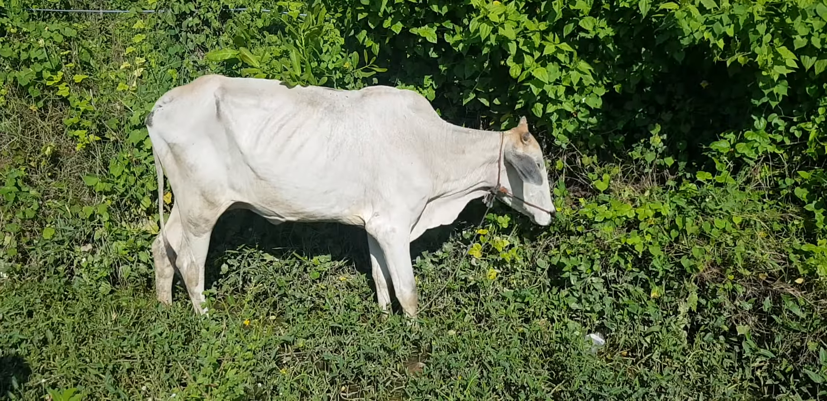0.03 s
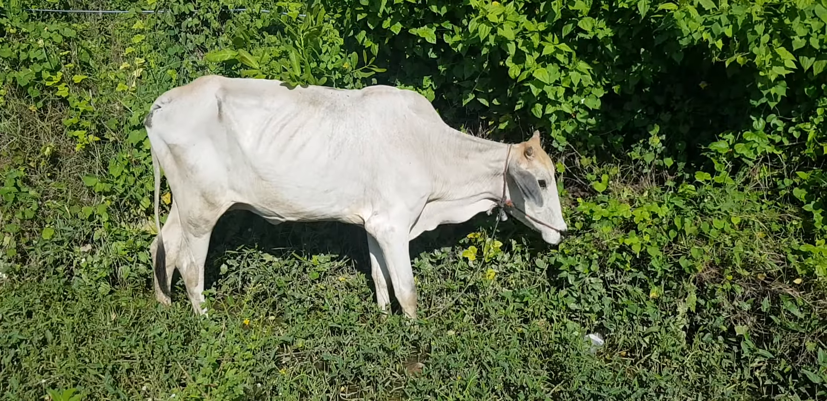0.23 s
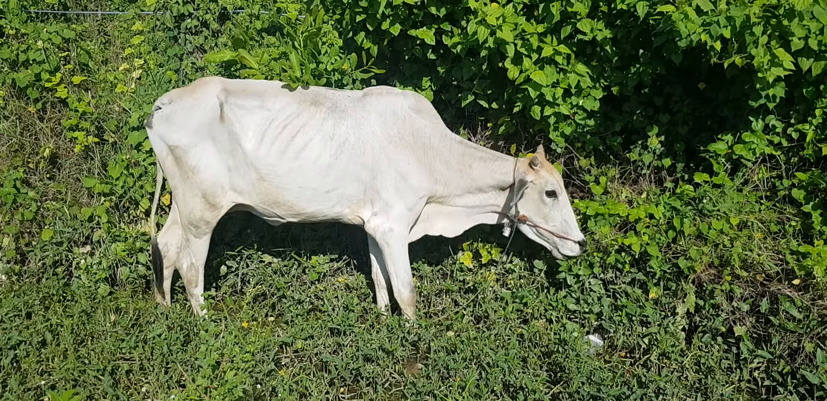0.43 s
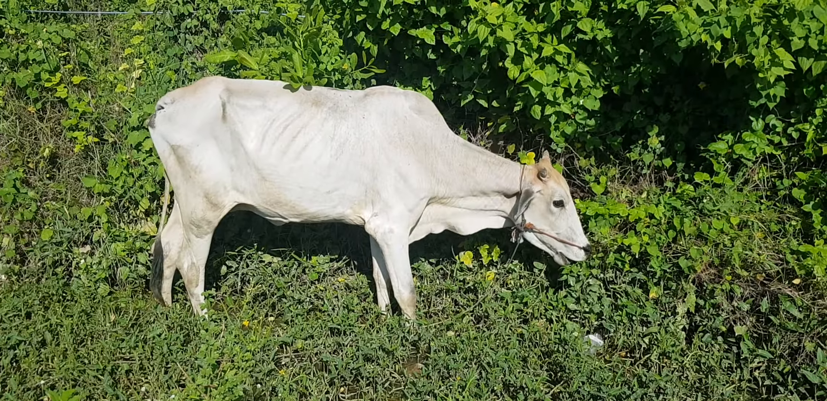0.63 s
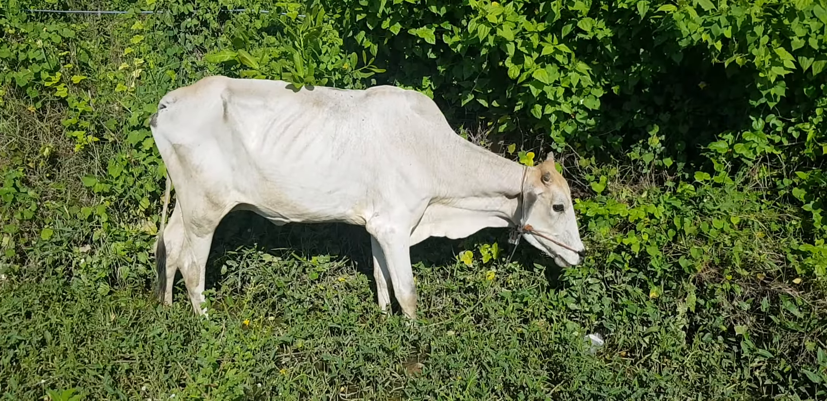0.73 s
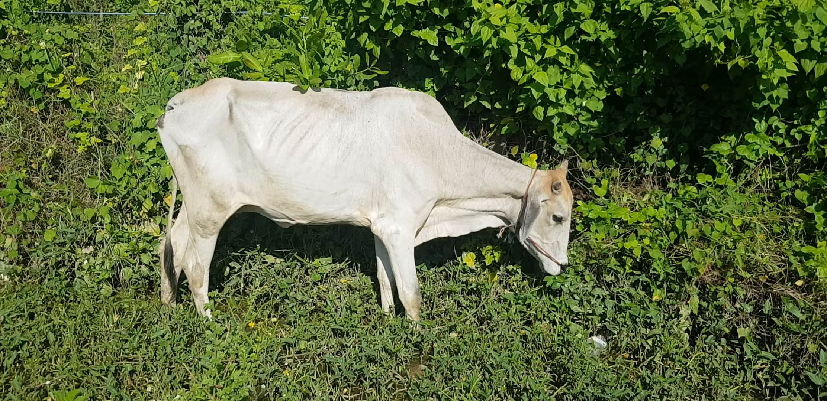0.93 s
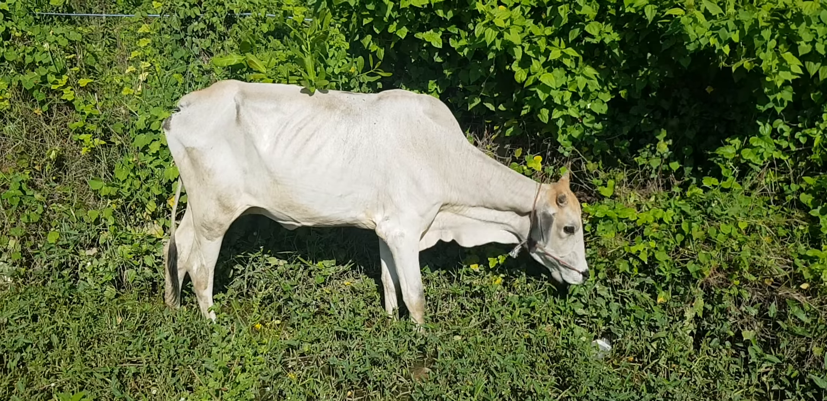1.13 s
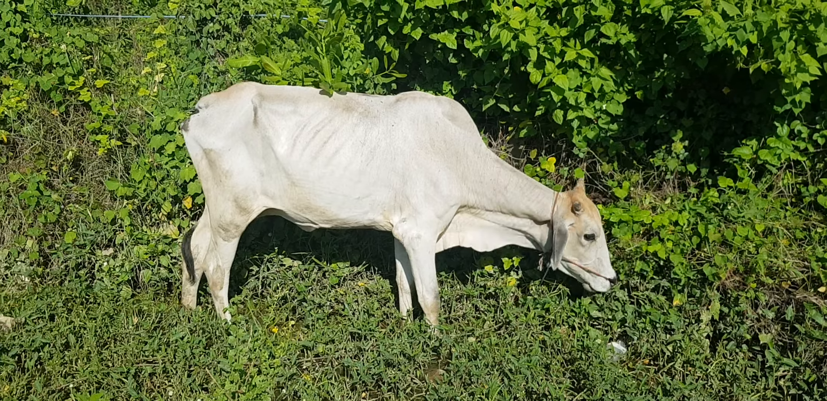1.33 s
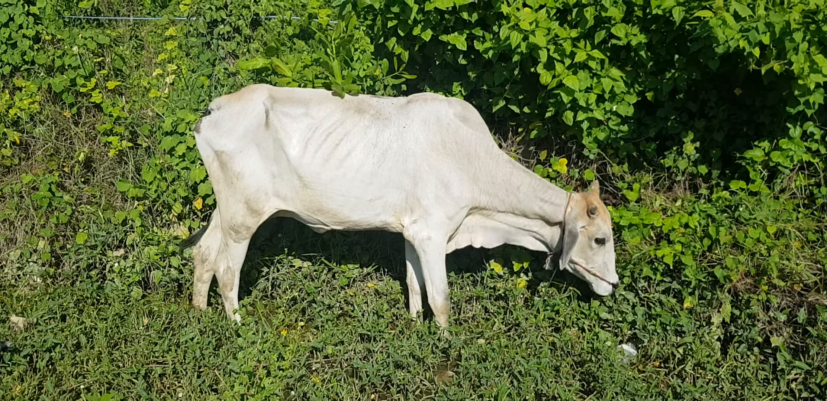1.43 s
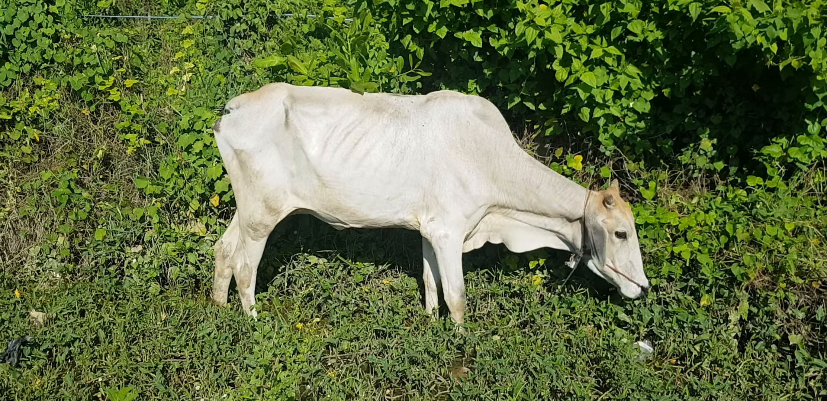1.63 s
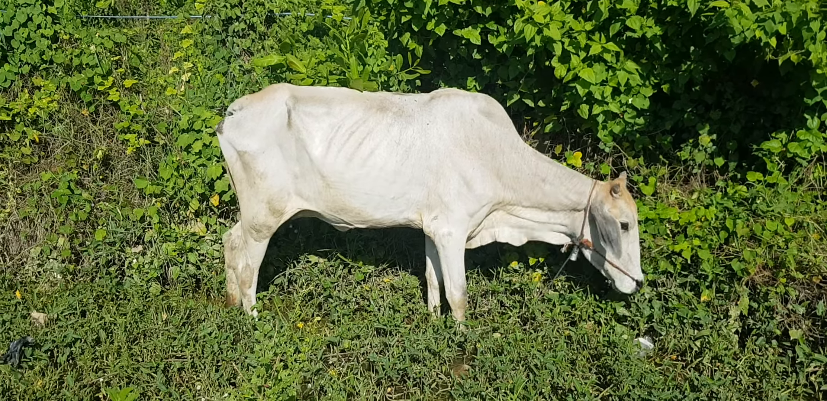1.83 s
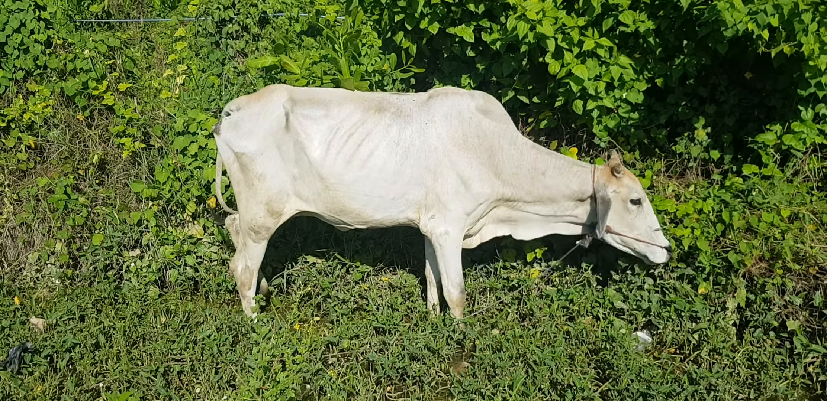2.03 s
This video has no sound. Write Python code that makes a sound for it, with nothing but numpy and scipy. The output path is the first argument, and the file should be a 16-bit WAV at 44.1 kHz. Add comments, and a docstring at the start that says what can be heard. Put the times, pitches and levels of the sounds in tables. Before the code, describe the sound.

Small high metallic bells on a grazing cow tinkle irregularly: light clinks from 0.2 s, a quick cluster at 0.55-0.95, the loudest bright strikes near 1.2, another clear one at 1.57, then weaker touches to 2.05. Rings decay within a second. Low wind rumble and leafy hiss continue; weeds brush around 0.7-1.2. A distant bird chirps hoarsely at 0.5, 1.6 and 1.95. Dull handling bumps near 1.05 and 2.06.

```python
"""Three small bells on a cow's neck tinkle as its head swings while it grazes in weeds near a phone.
Each bell is a set of decaying modes with beating twins, restarted at every blow, plus clapper clicks.
Shaped noise makes the wind buffeting two microphones, a far drone, rustling leaves and brushed weeds;
hoarse gliding tones make a far bird's falling and level chirps, and short pulses a hand on the phone."""
import sys
import numpy as np
from scipy import signal
from scipy.fft import rfft, irfft
from scipy.io import wavfile

SR = 44100
rng = np.random.default_rng(int(sys.argv[2]) if len(sys.argv) > 2 else 0)


def transcribe(u):
    """Save the signal u as a 16-bit wav file named by the first command-line argument.

    u: samples, shape (n,) or (channels, n), limited to [-1, 1]; the rate is SR.
    q: integer samples, one column per channel.
    """
    v = np.clip(np.atleast_2d(u).T, -1, 1)
    q = np.round(v * 32767).astype(np.int16)
    wavfile.write(sys.argv[1], SR, q)


N = 92610
T = np.arange(N) / SR  # time in seconds


def amp(db):
    """Gain from dB."""
    return 10 ** (np.asarray(db) / 20)


def unit(x):
    """Scale to an rms of 1."""
    return x / np.sqrt(np.mean(x ** 2))


def pan(db):
    """Left and right gains whose mean is 1, left over right by db."""
    ratio = amp(db)
    return np.array([2 * ratio / (1 + ratio), 2 / (1 + ratio)]).reshape(2, -1)


def curve(table, col=1):
    """A column drawn as straight lines over time."""
    points = np.array(table)
    return np.interp(T, points[:, 0], points[:, col])


def colour(table, hz):
    """The second column drawn as straight lines over log frequency."""
    points = np.array(table)
    return np.interp(np.log(hz), np.log(points[:, 0]), points[:, 1])


def noise(gain):
    """Noise of rms 1, white noise shaped by gain(Hz)."""
    hz = np.maximum(np.arange(N // 2 + 1) * SR / N, 1)
    return unit(irfft(rfft(rng.standard_normal(N)) * gain(hz), N))


def walk(rate):
    """Wandering control signal of rms 1 that thins out above rate in Hz."""
    return noise(lambda hz: 1 / (1 + (hz / rate) ** 2))


def wind():
    """Gusts buffet the ports, partly alike in both, and make the case throb; a far drone hums on."""
    # Gust path. Each row: time in s, buffet in dB before the mix, left-right in dB, throb in dB.
    gust_path = [(0.0, -52.5, 0, -54.5), (0.6, -66, 10, -44), (0.67, -52.5, 27, -37),
                 (0.81, -58.5, 16, -45), (1.05, -45.5, -4.5, -39), (1.29, -59.5, 10, -51),
                 (1.58, -56, -6, -56), (1.76, -46.5, 28, -43.5), (1.79, -45.5, 1.5, -61),
                 (2.1, -71, -12, -59.5)]
    # Buffet spectrum. Each row: frequency in Hz, relative level in dB per Hz.
    buffet_colour = [(22, -79), (40, -1), (60, -0.5), (90, -13), (130, -9), (250, -37), (500, -51.5)]
    # Drone bands. Each row: centre in Hz, width in Hz, level in dB.
    drone_bands = [(139.5, 49, -52.5), (210, 150, -64.5), (603, 123, -71.5)]
    throb_hz, throb_width_hz = 88.7, 33.3

    def gust():
        return noise(lambda hz: amp(colour(buffet_colour, hz)))

    def hum(hz, width):
        return noise(lambda f: 1 / (1 + ((f - hz) / width * 2) ** 2))

    both, own = gust(), np.array([gust(), gust()])
    buffet = amp(curve(gust_path)) * pan(curve(gust_path, 2)) * (1.37 * both + 1.61 * own)
    throb = amp(curve(gust_path, 3)) * hum(throb_hz, throb_width_hz) * pan(-1.5)
    drone = sum(amp(db) * hum(hz, width) for hz, width, db in drone_bands)
    return buffet + throb + drone


def field():
    """Leaves and far hiss in half-octave bands of noise; the bass is most alike left and right."""
    # Background spectrum. Each row: frequency in Hz, relative level in dB per Hz.
    field_colour = [(59, -30), (100, -5), (153, -4.5), (343, -20.5), (1010, -30), (1650, -23), (2990, -34),
                    (4670, -18), (8280, -71), (11400, 9.5), (16000, -43.5)]
    # Stereo lean. Each row: frequency in Hz, left-right in dB.
    field_lean = [(100, 3), (500, -7.5), (1200, 1.5), (4000, -16), (8000, 3.5), (16000, -1.5)]
    # Rustle path, used about its mean. Each row: time in s, mid in dB, treble in dB.
    rustle_path = [(0.0, -62, -70), (0.61, -66.5, -72.5), (0.74, -57.5, -68), (0.86, -56.5, -65.5),
                   (1.17, -58.5, -70.5), (1.37, -60, -72.5), (2.1, -58, -71)]
    field_db = -47.5
    flicker_db, flicker_hz = 2, 24.9  # the treble bands flicker as one

    mid = curve(rustle_path) - curve(rustle_path).mean()
    treble = curve(rustle_path, 2) - curve(rustle_path, 2).mean()
    treble = treble + flicker_db * walk(flicker_hz)
    out = 0
    for hz in 110 * 2 ** np.arange(0, 7.6, .5):
        def band():
            return noise(lambda f: np.exp(-(np.log2(f / hz) / 0.41) ** 2))

        alike = np.clip(130 / hz, 0, .9)  # share of power common to both sides
        stereo = np.sqrt(alike) * band() + np.sqrt(1 - alike) * np.array([band(), band()])
        swell = treble if hz > 6000 else mid * min(hz / 1200, 1)
        level_db = colour(field_colour, hz) + swell + walk(17)  # each band also wanders by 1 dB rms
        # a band's width grows with its pitch, hence the root
        out = out + amp(level_db) * np.sqrt(hz) * pan(colour(field_lean, hz)) * stereo
    return amp(field_db) * unit(out)


def clapper_clicks(strikes, contact_s):
    """Each blow gives a short hiss, and a weaker one as the clapper touches once more."""
    click_db, click_s = -17.5, 0.0026  # trim of the strikes' click levels, decay time
    bounce_s, bounce_db = 0.0063, -4.5

    def click_gain(hz):
        return np.exp(-np.log2(hz / 10500) ** 2 / .3) + np.exp(-np.log2(hz / 5400) ** 2 / .06)

    hiss = pan(-2) * [noise(click_gain) for _ in range(2)]
    out = np.zeros((2, N))
    for at, strike_db, *_ in strikes:
        for late, db in ((0, 0), (bounce_s, bounce_db)):
            t = np.maximum(T - at - late, 0)
            envelope = np.minimum(t / contact_s, 1) * np.exp(-t / click_s)
            out += amp(strike_db + click_db + db) * envelope * hiss
    return out


def bell(pitches, modes, strikes):
    """Each blow of the clapper resets the strength of every mode and of its beating twin."""
    # Shading of the left microphone around 5 kHz. Each row: time in s, left-right in dB.
    shading = [(0, 3.5), (.55, 5.5), (.7, -9), (1.2, -3.5), (2.1, -7)]
    contact_s, hard_db = .001, -26  # a blow whose click is under hard_db pushes longer
    twin_share, twin_lead = 0.72, 0.72  # twin's strength; its extra lead on the left in rad
    fifth_db = -17  # fifth mode against the fourth
    waver_depth, waver_hz = .1, 9

    def rise(row):
        push_s = contact_s * max(amp(hard_db - row[1]), 1)
        return np.clip((T - row[0]) / push_s, 0, 1)

    def decay(t, t60):
        return np.exp(-np.log(1000) * t / t60)

    out = np.zeros((2, N))
    ends = strikes[1:] + [(9, 0)]  # each blow lasts until the next; the final one is not cut
    for k, (hz, (t60, twin_t60, off_hz, left_db, lead)) in enumerate(zip(pitches, modes)):
        ring = np.zeros((2, N), complex)
        for row, end in zip(strikes, ends):
            t = np.maximum(T - row[0], 0)
            if k == 1:
                share = row[7]
            elif k == 4:
                share = -twin_share  # opposed twin: the fifth mode swells late
            else:
                share = twin_share * np.exp(1j * row[6])
            share = share * np.exp(1j * twin_lead * np.array([[1], [0]]))
            twin = share * decay(t, twin_t60) * np.exp(2j * np.pi * off_hz * t)
            db = row[2 + k] if k < 4 else row[5] + fifth_db
            ring += amp(db + 7.0) * (rise(row) - rise(end)) * (decay(t, t60) + twin)
        # each mode's level and phase waver at random, separately on each side, more when higher
        wander = np.array([walk(waver_hz) + 1j * walk(waver_hz) for _ in range(2)])
        waver = np.exp(waver_depth * (hz / 5000) ** 1.7 * wander)
        shade = curve(shading) * np.exp(-np.log2(hz / 5000) ** 2 / 0.6)
        tone = ring * np.exp(2j * np.pi * hz * T)
        out += pan(left_db + shade) * np.imag(waver * [tone[0] * np.exp(1j * lead), tone[1]])
    return out + clapper_clicks(strikes, contact_s)


def bells():
    """Three small bells, each with its own modes and its own run of blows."""
    # Mode pitches of each bell in Hz.
    pitches_a, pitches_b, pitches_c = [5024, 5762, 7508, 11085, 13825], [4627, 3471, 7340, 11360, 14800], [5448, 6434, 7943, 11275]
    # Modes in the order of the pitches. Each row: t60 in s, twin's t60 in s, twin's offset in Hz,
    # left-right in dB before shading, left lead in rad.
    modes_a, modes_b, modes_c = [(0.67, 0.23, 16, -12, 1.2), (0.42, 0.42, -8, -9.5, 1.56),
                                 (0.26, 0.21, 31, -10, 1.5), (0.22, 0.23, -63.5, 1, 2.08),
                                 (0.12, 0.079, 49, -7, 2.5)], [(0.38, .25, 13.5, -14.5, 1.3),
                                                 (0.26, 0.13, 9, -13.5, 1.84), (0.49, 0.054, -22, -27, 4.5),
                                                 (.2, 0.54, 35, 1.5, 1.1), (0.051, 0.086, 16, 0, 0.84)], [(1, 0.48, 10, -15, 0.46),
                                                                 (0.88, 0.44, 7.5, -10, 0.84),
                                                                 (0.09, 0.31, 25, -45, 9.8),
                                                                 (0.37, 0.18, 25.5, -14, 0.76)]
    # Clapper blows. Each row: start in s, click in dB before its trim, modes one to four in dB before
    # a 7 dB lift, phase of the twins in rad, signed share of the second mode's twin.
    strikes_a, strikes_b, strikes_c = [(0.377, -25, -42.5, -61, -58, -37.5, 2.07, 0.61),
                                       (.554, -24, -44, -45.5, -59, -33, 0.51, 0.049),
                                       (0.6192, -20, -41, -60, -53.5, -40.5, 1.27, .5),
                                       (0.6473, -50, -37.5, -54, -53.5, -41, 5.5, .4),
                                       (0.835, -29, -45.5, -74, -74, -47, 4, .3),
                                       (.936, -40, -45.5, -50.5, -61, -52, 1.6, 0.044),
                                       (1.246, -6.5, -28.5, -32, -38.5, -21.5, 2.5, 0.51),
                                       (1.57, -9.5, -36.5, -29, -48, -29.5, 0.75, -0.47),
                                       (1.7356, -20.5, -38, -48.5, -70, -44.5, 1.2, -1.7)], [(0.1988, -26, -41, -49, -61.5, -42.5, 3.56, -0.5),
                                                          (0.423, -27, -62, -53, -62, -50, 4.7, -0.9),
                                                          (0.671, -48, -45, -56.5, -73, -67, 6.5, -0.2),
                                                          (0.8787, -39, -35, -51.5, -52.5, -46, 1.9, 0.36),
                                                          (1.1066, -32, -51.5, -69, -64, -58, 1.36, 0.5),
                                                          (1.2183, -24, -33.5, -46, -43.5, -48, 2.06, -0.5),
                                                          (1.6975, -37, -51, -66, -54, -58, 5.8, 0.3),
                                                          (1.896, -48, -55, -66, -63.5, -57, 5, 0.3)], [(0.0044, -35, -66.5, -65.5, -66.5, -61, 0.5, 0.8),
                                                                             (0.83, -24, -56, -60, -83, -35, 3.7, 0.16),
                                                                             (1.1705, -14, -49.5, -61, -51.5, -49.5, 1.7, 0.3),
                                                                             (2.05, -39, -60.5, -72, -76, -58.5, 3.2, 0.45)]
    first = bell(pitches_a, modes_a, strikes_a)
    second = bell(pitches_b, modes_b, strikes_b)
    third = bell(pitches_c, modes_c, strikes_c)
    return first + second + third


def swishes():
    """Brushed weeds: short swells of broad noise, separate on each side and leaning right."""
    # Brushes. Each row: time of the peak in s, length in s, level in dB, centre in Hz.
    brushes = [(0.304, 0.011, -49, 8600), (0.687, 0.051, -47, 3870), (0.834, 0.065, -45, 9500),
               (1.228, 0.14, -47.5, 5500), (2.067, 0.03, -54.5, 3000)]
    out = 0
    for at, length, db, hz in brushes:
        leaf = np.array([noise(lambda f: np.exp(-np.log2(f / hz) ** 2 / 3.8)) for _ in range(2)])
        swell = np.exp(-((T - at) / length * 2) ** 2)
        out = out + amp(db) * swell * leaf * pan(-29.5)
    return out


def bird():
    """Short gliding whistles made hoarse by noise: falling steps, then a level peeping."""
    # Chirps. Each row: start in s, length in s, from Hz, to Hz, relative level in dB, hoarseness.
    chirps = [(0.508, 0.032, 5160, 3940, -60.5, 1.9), (0.534, 0.081, 3830, 2530, -57, 1.2),
              (1.614, 0.03, 4100, 3950, -46, 0.48), (1.64, 0.03, 3550, 3360, -46.5, 0.54),
              (1.654, 0.052, 2650, 2400, -54, 0.54), (1.934, 0.021, 2990, 3010, -55, .2),
              (1.969, 0.015, 3000, 2930, -53, .2), (1.993, 0.026, 2970, 2860, -55.5, 0.2)]
    rasp_width_hz = 320
    out = np.zeros(N)
    rasp = walk(rasp_width_hz) + 1j * walk(rasp_width_hz)
    for at, length, from_hz, to_hz, db, hoarse in chirps:
        u = np.clip((T - at) / length, 0, 1)  # progress through the chirp
        glide_hz = from_hz + (to_hz - from_hz) * u
        tone = np.exp(2j * np.pi * np.cumsum(glide_hz) / SR)
        out += amp(db) * np.sin(np.pi * u) * np.imag(tone * (0.93 + hoarse * rasp))
    return out * pan(-13)


def knocks():
    """A hand on the phone: short dull pushes on the case that swing back past zero."""
    # Pushes. Each row: start in s, level in dB before the pulse shape, left-right in dB.
    pushes = [(0.6, -33.5, 26), (1.051, -19, -35), (2.06, -26, -10)]
    knock_s = 0.00053
    out = 0
    for at, db, pan_db in pushes:
        u = np.maximum(T - at, 0) / knock_s
        out = out + amp(db) * u * np.exp(-u) * (1 - u / 3) * pan(pan_db)
    return out


def scene():
    """All layers together, as two channels."""
    return wind() + field() + bells() + swishes() + bird() + knocks()


def record(dry):
    """The phone cuts the top with a steep low-pass."""
    top_hz = 15800
    low_pass = signal.ellip(10, .2, 60, top_hz, fs=SR, output="sos")
    return signal.sosfilt(low_pass, dry)


dry = scene()
out = record(dry)
transcribe(out)
```